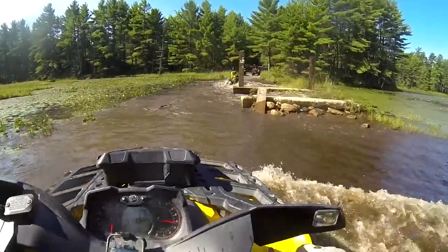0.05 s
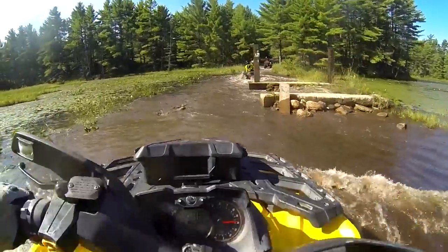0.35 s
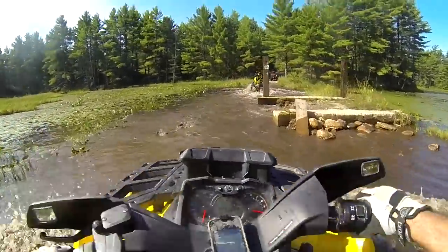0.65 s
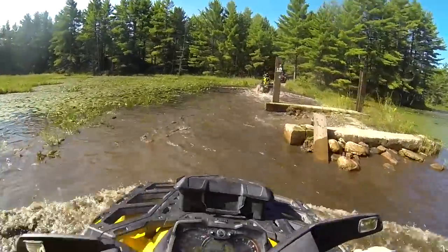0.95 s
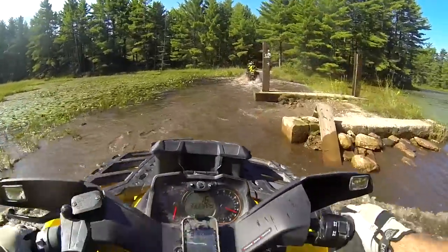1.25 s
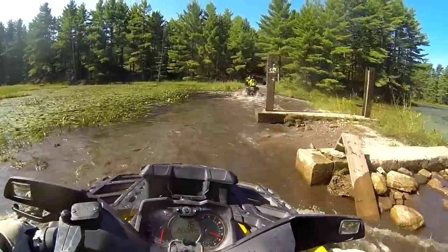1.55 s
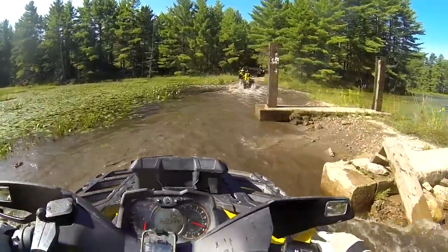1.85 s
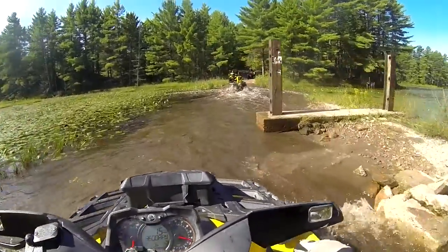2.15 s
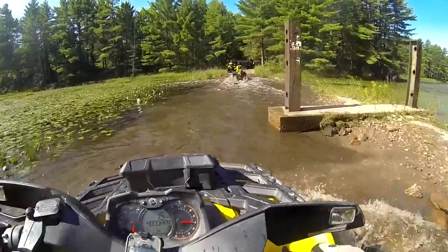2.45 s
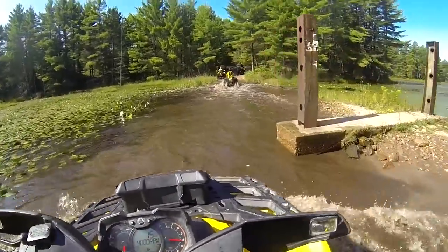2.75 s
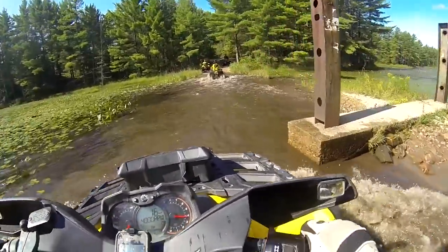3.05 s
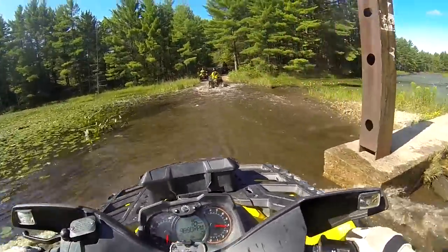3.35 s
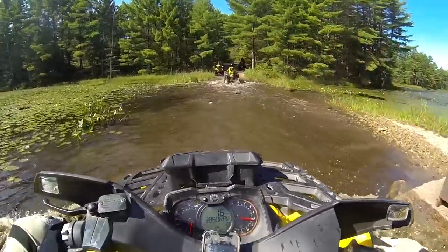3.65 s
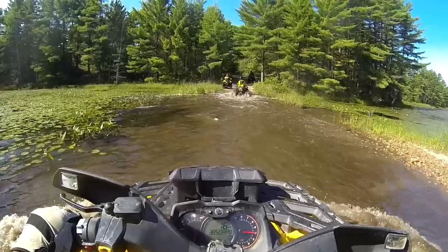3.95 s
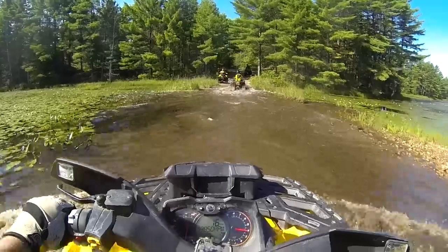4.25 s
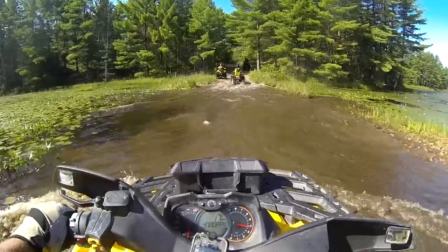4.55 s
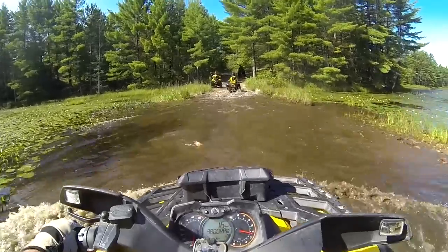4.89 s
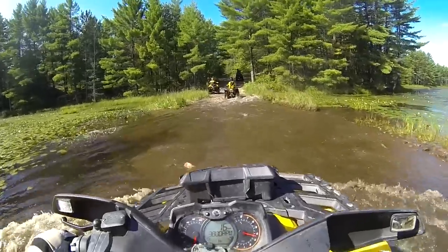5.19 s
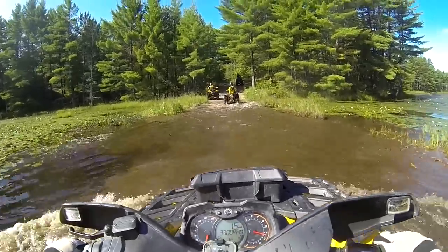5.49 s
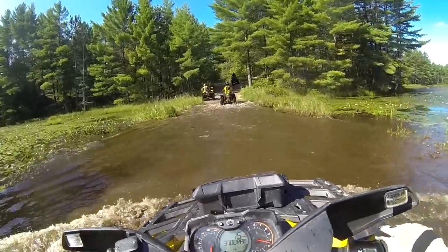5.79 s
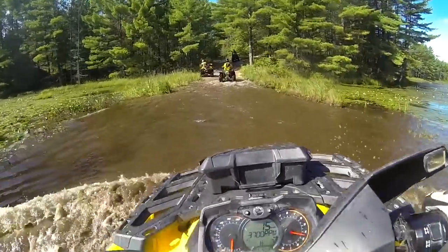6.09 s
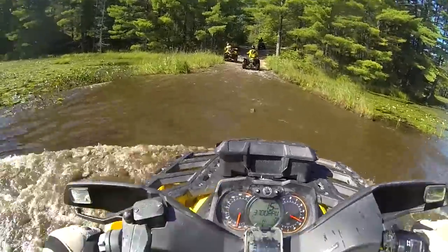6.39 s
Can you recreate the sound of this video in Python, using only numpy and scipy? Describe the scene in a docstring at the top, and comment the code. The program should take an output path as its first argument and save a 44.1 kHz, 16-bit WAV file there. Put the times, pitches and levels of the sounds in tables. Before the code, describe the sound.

From the rider's seat, a quad bike engine throbs loudly and without a break, its revs lifting and sagging slightly as it pushes through shallow water. A gliding growl and faint metallic rattle ride on the exhaust boom. Churned water rumbles below while a quieter bubbling wave and fine spray wash around the machine. Drops tap the close microphone in the first second, and again about five seconds in, as the exhaust grows heavier.

```python
"""The throb of a V-twin quad bike wading a flooded trail, close up, from a housed camera worn by the rider.
The engine wavers with the throttle: exhaust puffs boom in the silencer, the intake barks through
the air box and valves clatter under the covers. Below, the wheels churn the water into a foaming
bow wave, and a few drops tick on the housing, right at the microphone."""
import sys
import numpy as np
from scipy.fft import rfft, irfft, next_fast_len
from scipy.io import wavfile
from scipy.ndimage import uniform_filter1d, minimum_filter1d, map_coordinates

SR = 44100
rng = np.random.default_rng(int(sys.argv[2]) if len(sys.argv) > 2 else 0)


def to_wav(sig):
    """Store sig (one row per channel, or 1-D mono) as 16-bit WAV at the path in sys.argv[1].

    Samples outside -1..1 are clipped; the rate is SR.
    """
    pcm = np.clip(np.atleast_2d(sig), -1, 1) * 32767
    pcm = np.round(pcm).astype(np.int16)
    wavfile.write(sys.argv[1], SR, pcm.T)  # frames by channels


N = 292383

CRUISE = 32  # four-stroke cycles per second
# engine speed: (time [s], four-stroke cycles [1/s])
SPEED = [(0.0, 31.58), (0.05, 30.26), (0.25, 37.01), (0.33, 36.34), (0.41, 33.02), (0.52, 35.8),
         (0.69, 31.09), (0.87, 32.45), (0.97, 37.61), (1.12, 29.26), (1.45, 29.13), (1.48, 31.22),
         (1.7, 30.23), (2.01, 29.87), (2.16, 31.83), (2.23, 35.36), (2.33, 36.13), (2.48, 31.6),
         (2.69, 33.9), (2.95, 32.93), (3.1, 30.71), (3.2, 32.51), (3.48, 32.93), (3.73, 31.95),
         (3.92, 35.65), (4.48, 31.49), (4.56, 33.67), (4.68, 31.49), (5.26, 30.71), (5.33, 32.77),
         (5.44, 30.38), (5.6, 31.58), (5.78, 30.01), (5.91, 33.09), (6.0, 29.82), (6.15, 32.19),
         (6.31, 28.11), (6.42, 32.42), (6.56, 27.35), (6.63, 29.27)]
# hiss of spray and drops: (frequency [Hz], gain [dB])
SPRAY_SPECTRUM = [(2120, -47), (3600, -4), (4310, -11), (4870, -5), (6300, -0.5), (9790, -11),
                  (11700, -2.5), (14600, -10.5), (15200, -11.5)]


def exhaust(cycle):
    """One heavy puff per cycle booms in the silencer; the crank shakes the frame twice per cycle."""
    # exhaust boom: (time [s], level at cruising speed [dB])
    boom_levels = [(0.0, -16.5), (0.81, -19.5), (1.0, -17.5), (3.65, -16), (3.91, -18.5), (5.08, -12.5),
                   (5.87, -15.5), (6.11, -13.5), (6.63, -14.5)]
    # harmonics of a puff: (order [multiple of the cycle rate], relative level [dB])
    puff_orders = [(1, -17), (2, -15), (3, -1.5), (4, -1), (5, -.7), (6, -.7), (7, -10), (8, -17),
                   (10, -27), (14, -36), (40, -70)]
    # silencer resonances: (frequency [Hz], width [Hz], gain [dB])
    silencer_modes = [(145.7, 15.1, 8), (176.7, 26.4, 0), (199.6, 29, 1.5)]
    boom_db, = curves(boom_levels)
    speed, = curves(SPEED)
    order = np.arange(513)
    # the silencer holds back the higher orders, so each puff is a rounded upward chirp
    lag = np.exp(-.22j * (order - 4.4) ** 2)
    shape = irfft(causal(along(puff_orders, order)) * lag)
    angles = np.arange(len(shape)) / len(shape)
    puff = unit(np.interp(cycle - .52, angles, shape - shape.mean(), period=1))
    boom = unit(puff + .83 * ringing(puff * amp(.65 * wobble(30)), silencer_modes))
    boom_gain = amp(boom_db + .12 - .1 * (speed - CRUISE))  # softer as the revs rise
    shake = np.sqrt(2) * np.cos(2 * np.pi * 2 * cycle)
    shake_gain = effort(-23.5, per_throttle=.05, per_rev=.65, per_surge=-.0012)
    return boom_gain * boom + shake_gain * amp(.8 * wobble(5.6)) * shake


def intake(cycle):
    """Both cylinders gulp, unevenly spaced, through the air box; one overtone sings out clean."""
    # air box resonances: (frequency [Hz], width [Hz], gain [dB])
    airbox_modes = [(331, 54.6, 2), (402, 52, 2), (534, 51, -14.5), (752, 56, -15.5), (916, 80, -23)]
    front = strokes(cycle, angle=.41, scatter_db=1.5, jitter_s=.00013)
    rear = strokes(cycle, angle=.795, scatter_db=1.5, jitter_s=.00013)
    bark = ringing(-.55 * front - rear, airbox_modes)
    overtone = ringing(-np.cos(2 * np.pi * 13 * (cycle - .795)), airbox_modes)
    return (effort(-27.5, per_throttle=1.5, per_rev=.44, per_surge=.0521) * bark
            + effort(-30.5, per_throttle=-.05, per_rev=2.04, per_surge=-.0431) * overtone)


def howl(cycle):
    """The upper overtones glide with the revs, each swelling, fading and drifting a little on its own."""
    # engine overtones: (order [multiple of the cycle rate], relative level [dB])
    overtones = [(11, 1.5), (14, 0), (15, -1), (16, -5), (17, 1), (18, -1), (19, -4), (20, -4), (21, -5),
                 (22, -8), (23, -4), (24, -5), (26, -7), (27, -9), (28, -8), (29, -10)]
    tones = np.zeros(N)
    for order, db in overtones:
        swell = amp(db + 2.5 * wobble(5))
        tones += swell * np.sin(2 * np.pi * (round(order) * cycle + rng.random()) + .45 * wobble(6))
    return effort(-32.5, per_throttle=.9, per_rev=.4, per_surge=.08) * unit(tones)


def gas_rasp(cycle):
    """Rushing gas rasps at each firing."""
    # gas noise: (frequency [Hz], gain [dB])
    rasp_spectrum = [(150, -22), (300, 9.5), (450, 6.5), (620, 5.5), (690, -4), (760, 3.5), (830, -3),
                     (920, 1), (1150, -5.5), (1600, -17), (3000, -19.5), (5000, -77.5)]
    flow = .99 + gate(cycle, angle=.49, sharp=2.4) + gate(cycle, angle=.826, sharp=2.1)
    rasp = coloured(flow * rng.standard_normal(N), rasp_spectrum)
    return effort(-32, per_throttle=.5, per_rev=-.4, per_surge=.067) * rasp


def valve_clatter(cycle):
    """Valves rattle the engine covers in three bursts per cycle."""
    # cover resonances: (frequency [Hz], width [Hz], gain [dB])
    cover_modes = [(1285, 68, 0), (1397, 98, 0), (1670, 31, -6), (2361, 31, -3), (2590, 300, -11.5)]
    taps = sum(size * gate(cycle, angle, sharp=12) for angle, size in [(.63, 1), (.87, .7), (.2, .4)])
    noise = rng.standard_normal(N) + .5 * rng.standard_normal((2, N))
    clatter = ringing((.5 + taps) * noise, cover_modes)
    return effort(-41.5, per_throttle=.55, per_rev=.1, per_surge=0) * amp(.48 * wobble(5.3)) * clatter


def drive_line(cycle):
    """The drive line drones now and then; its belt casing rings in spells, rattled once per cycle."""
    # spells of drone: (middle [s], length [s], level [dB])
    drones = [(1.565, 0.43, -26), (3.62, 1, -28.5)]
    # spells of casing ring: (middle [s], length [s], pitch [Hz], level [dB])
    rings = [(0.743, 0.26, 1288, -42), (1.252, .6, 1290, -46.5), (1.854, 0.57, 1293, -42),
             (2.277, 0.17, 2350, -44.5), (2.75, 0.54, 2380, -46.5), (3.15, 0.23, 1310, -44),
             (3.15, .2, 2360, -47), (4.947, 0.48, 1300, -44), (5.7, 0.85, 1315, -49)]
    ring_q = 85
    drone_hz = 291.3 + 1.89 * wobble(12)
    tone = np.sqrt(2) * np.sin(2 * np.pi * np.cumsum(drone_hz) / SR)
    drone = sum(amp(db) * spell(middle, length) for middle, length, db in drones) * tone
    rattle = (.9 + gate(cycle, angle=.7, sharp=1.9)) * rng.standard_normal(N)
    return drone + sum(amp(db) * spell(middle, length) * ringing(rattle, [(hz, hz / ring_q, 0)])
                       for middle, length, hz, db in rings)


def wheel_churn():
    """The wheels churn the water deep down, below the rider."""
    # rumble of churned water: (frequency [Hz], gain [dB])
    churn_spectrum = [(15, -16), (35, -18), (50, -13), (68, -2), (115, 1), (200, -4), (280, -8), (450, -18),
                      (900, -34), (2500, -65)]
    gain = effort(-21.5, per_throttle=.6, per_rev=-.13, per_surge=.1332) * amp(1.83 * wobble(10))
    return gain * coloured(rng.standard_normal(N) + .046 * rng.standard_normal((2, N)), churn_spectrum)


def bow_wave():
    """The bow wave froths with bubbles and spray patters back, on both sides of the microphone."""
    # thrown water: (time [s], relative wave level [dB], relative spray level [dB])
    water_levels = [(0.0, -40, -55.5), (0.02, -43.5, -50.5), (0.57, -39, -48.5), (0.79, -44, -49.5),
                    (0.92, -41, -47.5), (1.07, -45, -51), (1.64, -45, -52.5), (2.07, -43, -50.5),
                    (2.29, -38.5, -48), (2.4, -43, -49.5), (2.64, -40.5, -49.5), (3.77, -46.5, -52),
                    (3.8, -44.5, -51), (6.17, -43, -51), (6.24, -47, -53), (6.63, -47, -51.5)]
    # wash of the wave: (frequency [Hz], gain [dB])
    wave_spectrum = [(300, -15.5), (900, 7.5), (1500, 0.5), (2100, 1), (2900, 1), (3300, -3.5), (3800, -33),
                     (5000, -34), (8000, -50)]
    wave_db, spray_db = curves(water_levels)
    froth = np.array([bubbles(count=4000, hz=1908, octaves=.72, cycles=18, size_db=-.5) for _ in range(2)])
    wave = spread(coloured(rng.standard_normal((2, N)) + .42 * froth, wave_spectrum))
    patter = np.array([bubbles(count=4000, hz=7000, octaves=.6, cycles=14, size_db=5) for _ in range(2)])
    spray = spread(coloured(rng.standard_normal((2, N)) + .24 * patter, SPRAY_SPECTRUM))
    return amp(wave_db + 5 + .48 * wobble(18)) * wave + amp(spray_db + 4 + .85 * wobble(40)) * spray


def drops():
    """Each drop is a brief wet tick with a faint ping on the housing."""
    # drops landing: (time [s], relative level [dB])
    hits = [(0.1007, -31), (0.4334, -32), (0.593, -26), (5.2764, -16.5), (5.335, -27), (5.42, -27)]
    ping_hz, decay_s = 5030, .03
    ticks = np.zeros((2, N + SR))
    t = np.arange(SR // 20) / SR
    for time, db in hits:
        tick = rng.standard_normal((2, len(t))) + .6 * np.sin(2 * np.pi * ping_hz * t)
        start = round(time * SR)
        ticks[:, start:start + len(t)] += amp(db - 12 - 60 * t / decay_s) * tick
    return filtered(ticks[:, :N], lambda hz: amp(along(SPRAY_SPECTRUM, hz)))


def effort(cruise_db, per_throttle, per_rev, per_surge):
    """A gain that follows throttle, revs and their surging as the wheels slip and grip; slopes in dB."""
    # how hard the engine pulls: (time [s], throttle [dB])
    throttle = [(0.0, -22.5), (0.28, -19), (0.39, -23.5), (0.94, -22), (1.07, -24), (1.57, -21), (1.9, -21),
                (2.23, -18), (2.47, -22.5), (3.21, -20.5), (4.32, -23.5), (4.38, -25.5), (4.91, -18.5),
                (5.41, -23.5), (5.47, -22.5), (5.67, -21.5), (5.78, -20.5), (5.98, -25.5), (6.09, -20.5),
                (6.13, -25.5), (6.17, -23), (6.63, -27.5)]
    throttle_db, = curves(throttle)
    speed, = curves(SPEED)
    pull_db = throttle_db - throttle_db.mean()
    surge = uniform_filter1d(np.abs(np.gradient(speed)) * SR, size=SR // 5)  # cycles per second squared
    return amp(cruise_db + per_throttle * pull_db + per_rev * (speed - CRUISE) + per_surge * surge)


def strokes(cycle, angle, scatter_db, jitter_s):
    """One pulse per engine cycle at the given share of the cycle, uneven in size and time."""
    timing, size = rng.standard_normal((256, 2)).T
    at = np.interp(np.arange(len(timing)) + angle, cycle, np.arange(N), right=2 * N)
    at += jitter_s * SR * timing
    heard = (at >= 0) & (at < N)
    return np.bincount(at[heard].astype(int), amp(scatter_db * size[heard]), N)


def gate(cycle, angle, sharp):
    """A window that opens once per engine cycle, at the given share of it."""
    return np.exp(sharp * (np.cos(2 * np.pi * (cycle - angle)) - 1))


def spell(middle, length):
    """A gain that swells, holds and fades around the given time."""
    return np.exp(-(2 * (np.arange(N) / SR - middle) / length) ** 4)


def bubbles(count, hz, octaves, cycles, size_db):
    """Short rising pings of random pitch and size, at rms 1."""
    t = np.arange(SR // 80) / SR
    start = rng.integers(0, N, count)
    pitch = np.minimum(hz * 2 ** (octaves * rng.standard_normal((count, 1))), SR / 3)
    size = amp(size_db * np.minimum(rng.exponential(size=(count, 1)), 4))
    age = pitch * t / cycles
    rise = 1 + np.minimum(age, 1) / 10
    ping = size * np.exp(-3 * age) * np.sin(2 * np.pi * pitch * t * rise)
    at = start[:, None] + np.arange(len(t))
    return unit(np.bincount(at.ravel(), ping.ravel(), N)[:N])


def spread(pair):
    """Two unrelated signals become left and right, alike in the bass."""
    # likeness of left and right: (frequency [Hz], correlation [0 to 1])
    likeness = [(400, .98), (900, .8), (1500, .5), (2700, .45), (4000, 0), (15000, 0)]
    def mid_side_gains(hz):
        turn = np.arccos(np.clip(along(likeness, hz), -1, 1)) / 2
        return np.array([np.cos(turn), np.sin(turn)])
    mid, side = filtered(pair, mid_side_gains)
    return unit(np.array([mid + side, mid - side]))


def amp(db):
    """Decibels to gain."""
    return 10 ** (np.asarray(db) / 20)


def unit(x):
    """Scale to rms 1."""
    return x / np.sqrt(np.mean(x ** 2) + 1e-20)


def along(points, hz):
    """(Hz, value) points read on a log axis."""
    f, v = np.transpose(points)
    return np.interp(np.log(hz + 1), np.log(f + 1), v)


def curves(rows):
    """One value per sample for each column after the time."""
    times, *columns = np.transpose(rows)
    return [np.interp(np.arange(N) / SR, times, column) for column in columns]


def wobble(rate):
    """A smooth random curve, rate knots a second."""
    return map_coordinates(rng.standard_normal(int(N * rate / SR) + 4), [np.arange(N) * rate / SR])


def filtered(x, response):
    """x times a complex response of frequency."""
    size = 2 * next_fast_len(N // 2 + SR // 4)
    return irfft(rfft(x, size) * response(np.fft.rfftfreq(size, 1 / SR)), size)[..., :x.shape[-1]]


def causal(db):
    """The complex response with these gains that answers as early as it can."""
    cepstrum = irfft(np.log(amp(db)))
    half = len(cepstrum) // 2
    return np.exp(rfft(2 * cepstrum[:half], 2 * half) - cepstrum[0])


def coloured(x, points):
    """x through a causal filter with the given (Hz, dB) gain, at rms 1."""
    return unit(filtered(x, lambda hz: causal(along(points, hz))))


def ringing(x, modes):
    """x through (Hz, width, dB) resonances of alternating sign, at rms 1."""
    def response(hz):
        return sum((-1) ** k * amp(db) * 1j * hz * width / (centre ** 2 - hz ** 2 + 1j * hz * width)
                   for k, (centre, width, db) in enumerate(modes))
    return unit(filtered(x, response))


def limited(x, ceiling):
    """The camera turns its gain down smoothly around the tallest peaks."""
    needed = np.minimum(1, ceiling / (np.abs(x).max(axis=0) + 1e-9))
    gain = minimum_filter1d(needed, size=SR // 60)
    return x * uniform_filter1d(uniform_filter1d(gain, size=SR // 120), size=SR // 120)


def scene():
    """From the rider's seat: every engine layer follows the same crank, with the water around it."""
    speed, = curves(SPEED)
    cycle = np.cumsum(speed) / SR + .16
    engine = exhaust(cycle) + intake(cycle) + howl(cycle) + gas_rasp(cycle) + valve_clatter(cycle)
    return engine + drive_line(cycle) + wheel_churn() + bow_wave() + drops()


def record(dry):
    """The housing colours each port differently; the camera limits peaks and band and adds an offset."""
    # the housing's two microphone ports: (frequency [Hz], left minus right [dB])
    port_balance = [(60, 1), (400, 0.26), (1100, 0.9), (1300, -1), (1500, -3.5), (1850, -8), (2200, 1.5),
                    (3000, -0.5), (4100, -5.5), (5200, 2.5), (6300, 6), (8000, -3.5), (10400, -1.5),
                    (11700, -17), (15000, -10)]
    top_hz, lag_samples = 15350, 1.2
    def ports(hz):
        gain = amp(np.outer([.5, -.5], along(port_balance, hz)))
        lag = np.exp(-2j * np.pi * np.outer([lag_samples, -lag_samples], hz) / SR)
        return lag * gain / np.sqrt(np.mean(gain ** 2, axis=0))
    dc_offset = np.array([[.073], [.103]])
    edge = SR // 20
    padded = np.pad(dry, ((0, 0), (edge, edge)), "reflect", reflect_type="odd")
    held = limited(filtered(padded, ports), ceiling=.85)
    return dc_offset + filtered(held, lambda hz: hz < top_hz)[:, edge:-edge]


dry = scene()
out = record(dry)
to_wav(out)
```